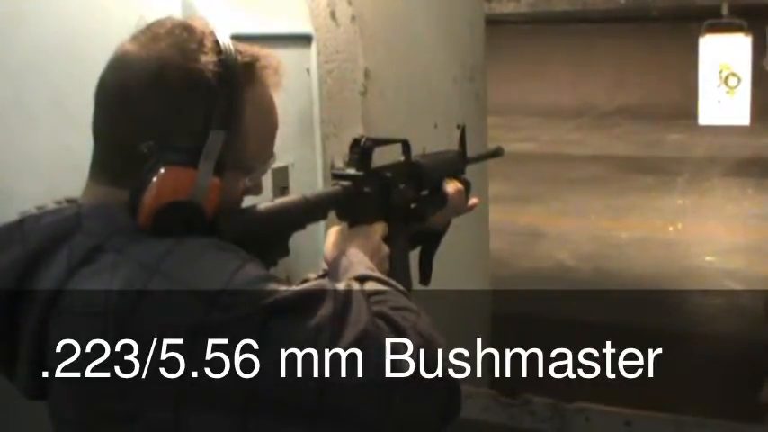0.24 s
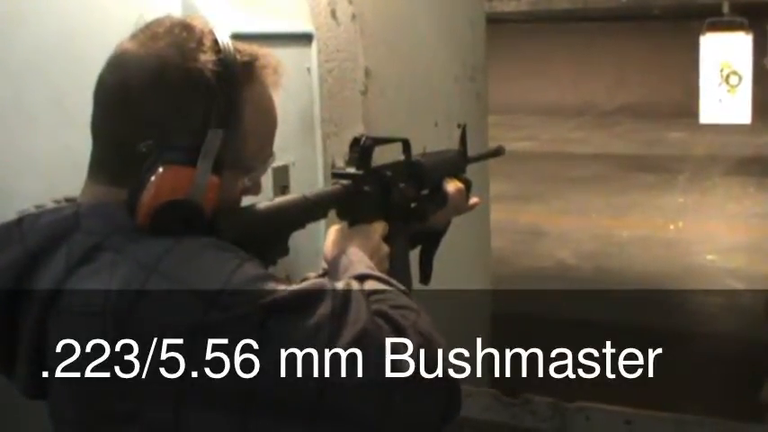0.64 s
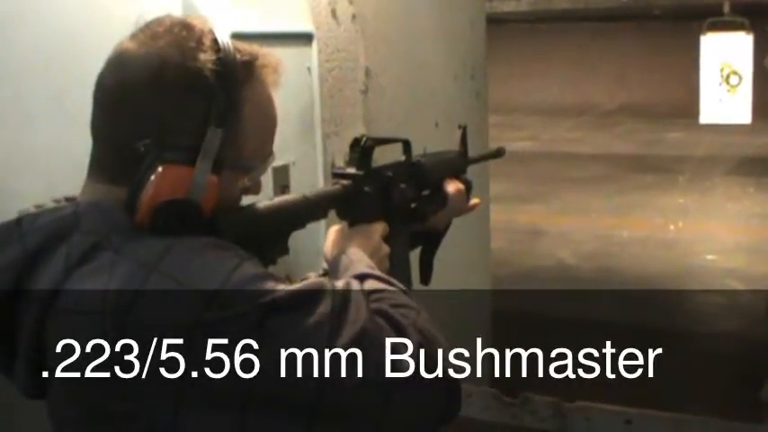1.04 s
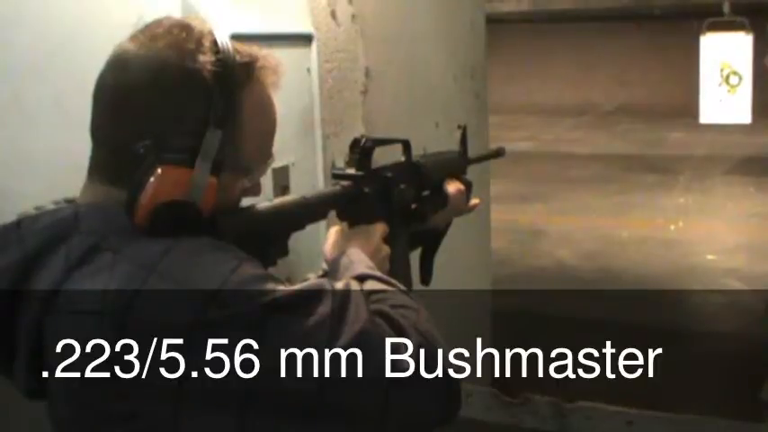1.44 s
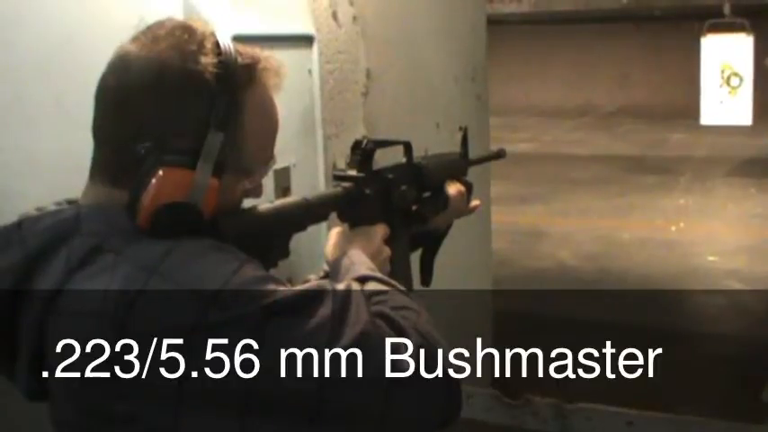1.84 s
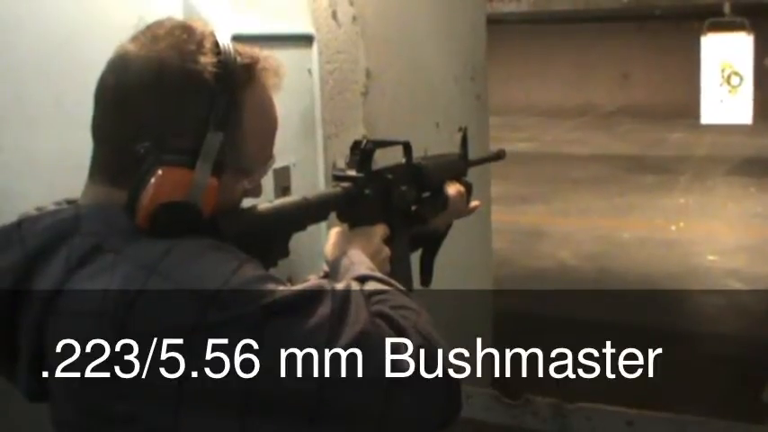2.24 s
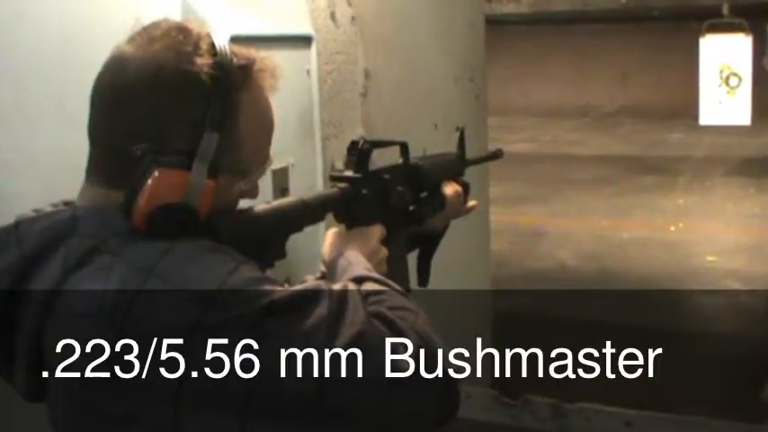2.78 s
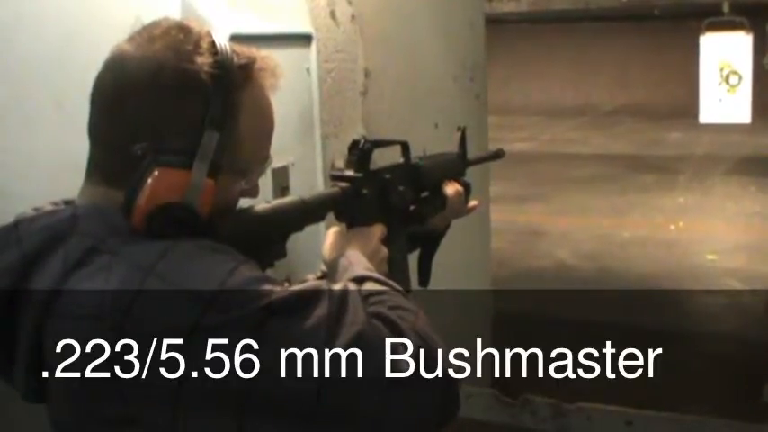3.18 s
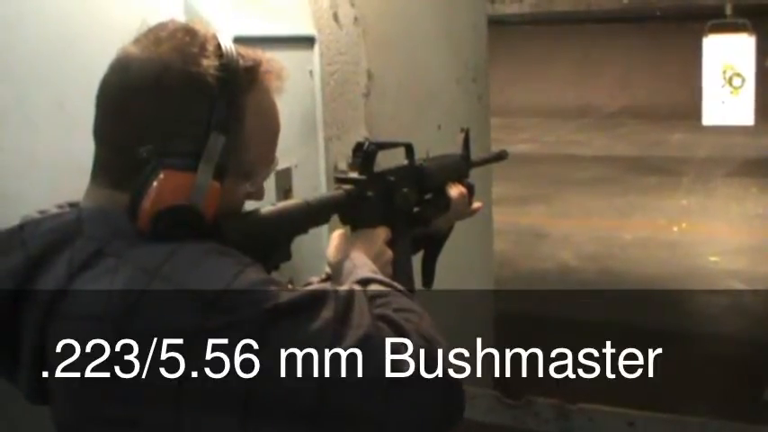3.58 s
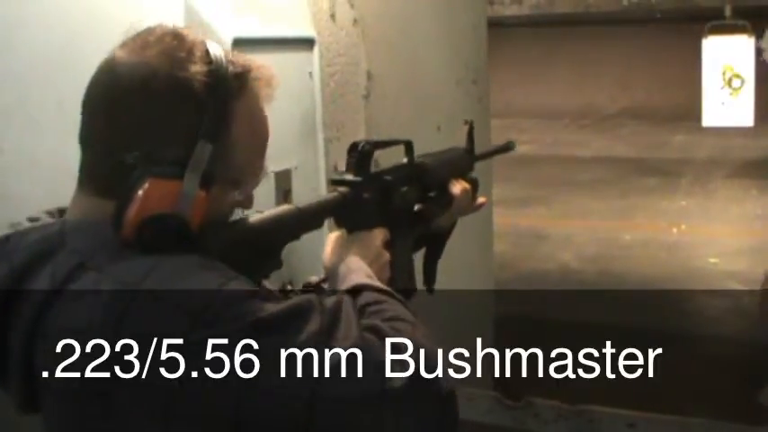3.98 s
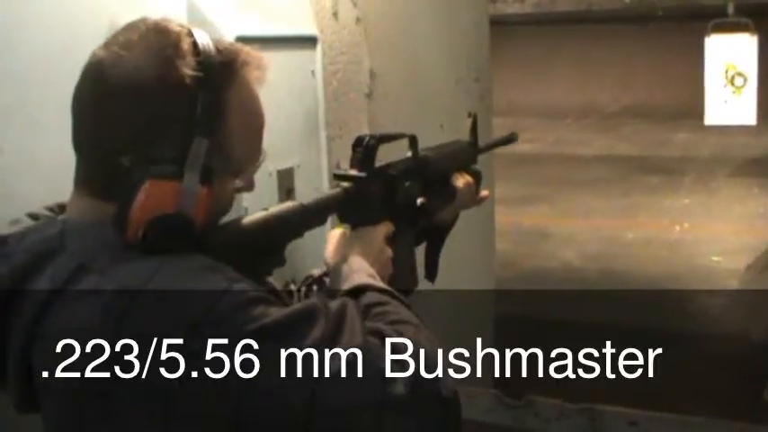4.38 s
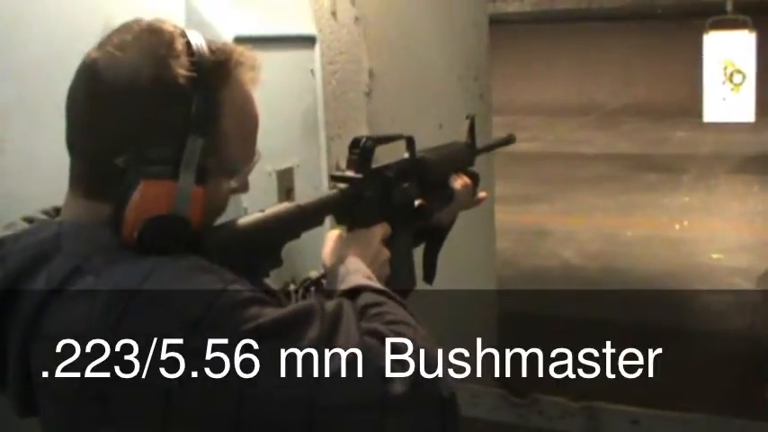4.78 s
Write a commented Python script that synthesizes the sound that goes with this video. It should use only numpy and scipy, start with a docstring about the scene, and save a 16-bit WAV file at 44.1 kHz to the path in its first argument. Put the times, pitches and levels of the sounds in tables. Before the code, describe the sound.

Rifle blasts boom through an indoor concrete range, one alone then two close together, with long roaring echoes, tinkling brass and steady ventilation rumble.

```python
"""The roar of a rifle shot fired 0.6 s earlier in a concrete range decays over steady ventilation noise.
From 0.8 to 1.4 s brass cases tinkle as modal resonators driven by echoes; at 2.2 s the same booth fires again,
at 3.7 and 4.0 s two others. Each blast is shaped noise: treble dies first, a wave returns from the far end and
a mid-range tail lingers. The air's hiss swells and sinks about 4 s; a limiter and overload compress the peaks."""
import sys
import numpy as np
from scipy import signal
from scipy.io import wavfile

SR = 44100
rng = np.random.default_rng(int(sys.argv[2]) if len(sys.argv) > 2 else 0)


def master(y):
    """Save y as 16-bit WAV."""
    cut = np.clip(np.atleast_2d(y).T, -1, 1)
    pcm = np.round(cut * 32767)  # scale
    wavfile.write(sys.argv[1], SR, pcm.astype(np.int16))


N = 221426
HEARD = 3 * SR  # length of one hall answer, samples


def shots():
    """Superposition: every shot adds its booth's response, and shots from one booth wake the very same echoes."""
    # one list of shots per booth: t/s, blast gain/dB
    shot_lists = [
        [(-.6232, 16.5), (2.1527, 16.5)],
        [(3.6832, 17)],
        [(3.9680, 19.5)],
    ]
    # booths: crack level/dB, crack t60/s, cycles to gather, bass boost/dB, boost near 1.3 kHz/dB,
    # roar decay stretch (factor), far wave arrival t/s, far wave level relative to the roar/dB
    booths = [(-31, .2, 2.2, -0.9, -0.64, 1.029, 0.36, 1), (-42, 0.097, 0.83, 0.5, 0.5, 0.85, 0.2, -9),
              (-4, 0.11, 4.2, 3, -5, 1.023, 0.17, -8.5)]
    out = np.zeros((2, SR + N + HEARD))  # begins 1 s early, to hold the shot before t = 0
    for booth, fired in zip(booths, shot_lists):
        answer = hall(*booth)
        for shot_s, blast_db in fired:
            start = SR + int(round(shot_s * SR))
            out[:, start:start + HEARD] += from_db(blast_db) * answer
    return out[:, SR:SR + N]


def hall(crack_db, crack_t60, cycles, bass_db, dip_db, stretch, far_s, far_db):
    """Frequency-dependent reverberation: crack between the partitions, roar, far wave, lingering tail and rings."""
    # relative spectra before the blast gain: f/Hz, density/dB per Hz
    crack_spectrum = [(300, -13.5), (1000, -1), (3000, -8), (7000, -11.5), (12000, -14), (16000, -19.5)]
    roar_spectrum = [(20, 1), (40, -6.5), (80, -10), (150, -7.5), (300, -4.5), (420, -1), (560, -4),
                     (750, -1), (1000, -4), (1300, -6.5), (2500, -13.5), (5000, -21.5), (9000, -27),
                     (16000, -33)]
    linger_spectrum = [(150, -18.5), (300, -26.5), (500, -11), (680, -3.5), (850, 2), (1050, -22),
                       (1400, -17), (2800, -20.5), (5000, -35.5), (9000, -57.5)]
    # decay of the roar before the booth's stretch: f/Hz, t60/s
    roar_t60 = [(40, 1.42), (120, 1.156), (300, 1.039), (700, 1.194), (1500, 1.121), (3000, 1),
                (6000, 0.77), (9000, 0.65), (12000, 0.53), (16000, 0.3)]
    # stereo spread: f/Hz, side minus mid level/dB
    roar_side = [(30, -19.5), (150, -16), (380, -13), (950, -9.5), (2400, -10.5), (6000, -4), (15000, -8.5)]
    # hall resonances in the tail: f/Hz, single-pass width/Hz, rms level before decay and blast gain/dB
    hall_rings = [(401.8, 23, -55.5), (522, 16, -59.5), (654, 29, -45), (724.4, 11, -50), (831, 16, -49.5),
                  (846, 17, -48), (996, 18, -51.5)]
    linger_db, linger_t60_s, rings_t60_s = -29, 4.11, 2.81
    build_s, far_spread_s, far_dull_hz = 0.0024, 0.044, 7000

    age, out = np.arange(HEARD) / SR, 0
    far_arrival = 1 / (1 + np.exp(np.clip((far_s - age) / far_spread_s, -50, 50)))
    for hz, noise in noise_bands(HEARD, roar_side):
        crack = from_db(crack_db + at_hz(crack_spectrum, hz)) * dying(age, crack_t60)
        bass_boost_db = bass_db / (1 + (hz / 400) ** 2)
        mid_boost_db = dip_db * np.exp(-(np.log(hz / 1300) / .5) ** 2)
        roar_db = at_hz(roar_spectrum, hz) + bass_boost_db + mid_boost_db
        # the long way costs treble
        far_wave = 1 + from_db(far_db) * far_arrival / (1 + (hz / far_dull_hz) ** 2)
        roar = from_db(roar_db) * dying(age, stretch * at_hz(roar_t60, hz)) * far_wave
        linger = from_db(linger_db + at_hz(linger_spectrum, hz)) * dying(age, linger_t60_s)
        build = 1 - np.exp(-age / (build_s + cycles / hz))  # lows take longer to gather
        envelope = np.sqrt(crack ** 2 + roar ** 2 + linger ** 2)  # powers add
        out = out + noise * build * envelope

    # mostly common to both channels, with a little unrelated noise in each
    stir = rng.standard_normal(HEARD) + 0.1 * rng.standard_normal((2, HEARD))
    for hz, width_hz, db in hall_rings:
        ring = rms_one(resonance(stir, hz, width_hz))
        out = out + from_db(db) * ring * dying(age, rings_t60_s)
    return out


def cases():
    """Modal excitation: each bounce on concrete is a dying scatter of echoes that ticks and rings the tube's modes."""
    # bounces: t/s, tick level/dB, low ring level/dB, high ring level/dB, echoes t60/s
    bounces = [(.768, -67, -100, -65.5, 0.58), (.912, -65, -81, -90, 1.1), (1.222, -74, -67.5, -79, 0.88),
               (1.430, -76, -90, -75, 1.6)]
    # modes of a brass case, a low group and a high group: f/Hz, level within the group/dB, t60/s
    brass_modes = [
        [(4940, -12.5, .01), (5400, -6.5, .02), (5600, 2.5, 0.015), (5650, -5, .01), (6300, -7, .005)],
        [(11210, 8, 0.1), (11310, 1, 0.2)],
    ]
    t, out = np.arange(N) / SR, np.zeros((2, N))
    tick_band = signal.butter(2, [2500, 9000], "band", fs=SR, output="sos")
    for bounce_s, tick_db, low_db, high_db, echoes_t60 in bounces:
        echoes = (t >= bounce_s) * dying(np.maximum(t - bounce_s, 0), echoes_t60)
        scatter = rng.standard_normal((2, N)) * echoes + 1e-18
        out += from_db(tick_db) * signal.sosfilt(tick_band, scatter)
        for ring_db, modes in zip((low_db, high_db), brass_modes):
            for hz, db, t60 in modes:
                r, w = dying(1 / SR, t60), 2 * np.pi * hz / SR  # pole radius and angle
                drive = from_db(ring_db + db) * np.sqrt(1 - r * r)  # longer rings gather the same energy
                ring = signal.lfilter([0, np.sin(w)], [1, -2 * r * np.cos(w), r * r], scatter)
                out += drive * ring
    return out


def ventilation():
    """Resonant filtering of broadband flow noise: a few duct resonances stand out of the air noise."""
    # relative spectrum of the air: f/Hz, density/dB per Hz
    air_spectrum = [(20, 18.5), (40, 6.5), (80, -3), (130, -7), (190, -13.5), (300, -8), (480, -16.5),
                    (800, -17), (1600, -23.5), (2500, -33.5), (4500, -42), (8000, -50.5), (16000, -57)]
    # stereo spread: f/Hz, side minus mid level/dB
    air_side = [(60, -31.5), (180, -28.5), (550, -16.5), (1650, -12), (5000, -6.5), (15000, 0)]
    # duct resonances: f/Hz, single-pass width/Hz, gain of the added peak/dB
    ducts = [(82, 27, 0), (135, 25, -3.5), (162.2, 15, -3.5), (233, 28, -12.5), (284.8, 20, 2.5),
             (313, 27, 3.5), (363, 36, 3), (380, 21, -1), (877, 100, 4)]
    # gain on the air noise after scaling to rms 1: t/s, level/dB
    air_level = [(.65, -41.5), (1.0, -39.5), (3.6, -38), (5.0, -39.5)]
    swell_s, swell_scale_s, swell_db = 4, .2, 22  # peak time, rise and fall constant, boost limit at high f

    t = np.arange(N) / SR
    swell = swell_db * np.exp(-np.abs(t - swell_s) / swell_scale_s)
    air = 0
    for hz, noise in noise_bands(N, air_side):
        hiss_boost_db = swell / (1 + (2000 / hz) ** 2)  # mainly above 2 kHz
        air = air + from_db(at_hz(air_spectrum, hz) + hiss_boost_db) * noise
    air = air + sum(from_db(db) * resonance(air, hz, width_hz) for hz, width_hz, db in ducts)
    return from_db(np.interp(t, *np.transpose(air_level))) * rms_one(air)


def noise_bands(size, side_table):
    """Band decomposition: third-octave bands of mid-side stereo noise as (centre Hz, left and right)."""
    edges, run_in = 20 * 2 ** (np.arange(31) / 3), SR // 4
    white = rng.standard_normal((2, 2, size + run_in))  # neighbouring bands get unrelated noise
    for k, (low, high) in enumerate(zip(edges, edges[1:])):
        band = signal.butter(3, [low, high], "band", fs=SR, output="sos")
        mid, side = signal.sosfilt(band, white[k % 2])[:, -size:]
        hz = np.sqrt(low * high)
        yield hz, mid + from_db(at_hz(side_table, hz)) * side * [[1], [-1]]


def resonance(x, hz, width_hz):
    """Two-pole resonance: a peak of gain 1, applied twice for steep skirts."""
    r = np.exp(-np.pi * width_hz / SR)
    b = (1 - r * r) / 2 * np.array([1, 0, -1])
    a = [1, -2 * r * np.cos(2 * np.pi * hz / SR), r * r]
    return signal.lfilter(b, a, signal.lfilter(b, a, x))


def dying(age, t60):
    """Exponential decay: the level falls 60 dB in t60 seconds."""
    return from_db(-60 * age / t60)


def at_hz(points, hz):
    """Log-frequency interpolation: value of an (f/Hz, value) table at hz."""
    return np.interp(np.log(hz), np.log(np.array(points)[:, 0]), np.array(points)[:, 1])


def rms_one(x):
    """Power normalisation: scales to rms 1."""
    return x / np.sqrt(np.mean(x ** 2) + 1e-20)


def from_db(db):
    """Logarithmic level: amplitude gain of a level in dB."""
    return 10 ** (np.asarray(db) / 20)


def scene():
    """Linear superposition of shots, cases and air."""
    return shots() + cases() + ventilation()


def limiter(x):
    """Gain control: one gain holds both channels' short-time level under the limit and recovers at a set rate."""
    limit_db, sense_s, release_db_s = -2, 0.002, 199
    r = np.exp(-1 / (sense_s * SR))
    power = signal.lfilter([1 - r], [1, -r], np.mean(x ** 2, axis=0))
    level_db = 10 * np.log10(power + 1e-12)
    # a running maximum against a ramp falls no faster than the release rate
    ramp = release_db_s * np.arange(N) / SR
    held_db = np.maximum.accumulate(level_db + ramp) - ramp
    return x * from_db(-np.maximum(held_db - limit_db, 0))


def record(dry):
    """Nonlinear overload: limiter, squeezing input stage, widening, bass cut, clipping converter, treble cut."""
    capsule_knee, squeeze, clip = 0.55, .25, .98  # amplitude, exponent, amplitude
    widen_below_hz, low_cut_hz, top_cut_hz, out_db = 3600, 117.4, 15750, -.5
    held = limiter(dry)
    left, right = held * (1 + (held / capsule_knee) ** 2) ** -squeeze
    # the difference of the close-set capsules is doubled below the treble
    side = (left - right) / 2
    side = side + signal.lfilter(*signal.butter(1, widen_below_hz, fs=SR), side)
    wide = (left + right) / 2 + side * [[1], [-1]]
    thinned = signal.sosfilt(signal.butter(2, low_cut_hz, "high", fs=SR, output="sos"), wide)
    clipped = np.clip(from_db(out_db) * thinned, -clip, clip)
    top_cut = signal.ellip(10, .3, 60, top_cut_hz, fs=SR, output="sos")
    return signal.sosfilt(top_cut, clipped)


dry = scene()
out = record(dry)
master(out)
```